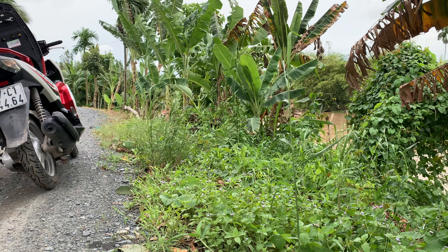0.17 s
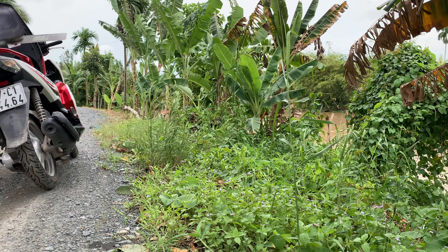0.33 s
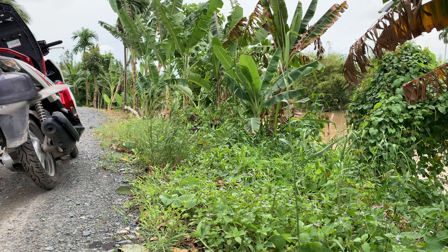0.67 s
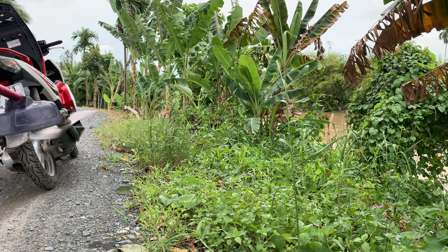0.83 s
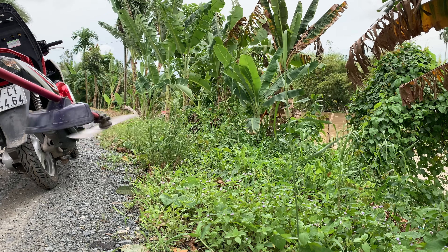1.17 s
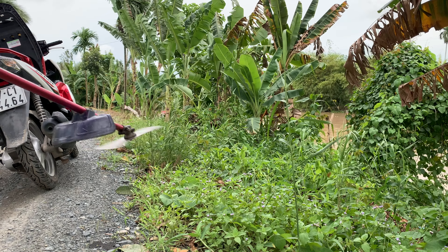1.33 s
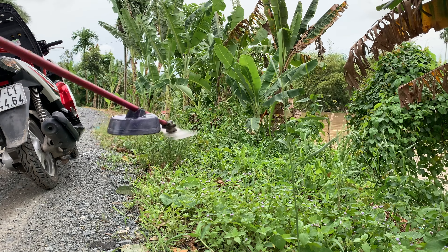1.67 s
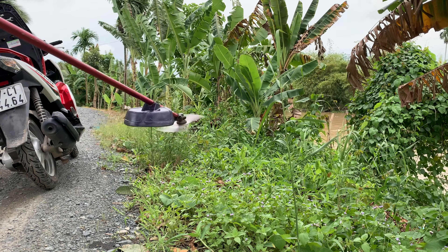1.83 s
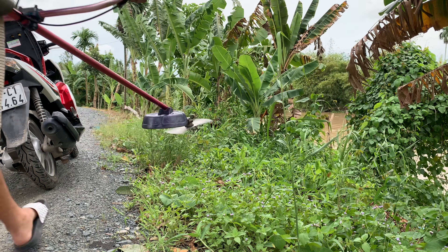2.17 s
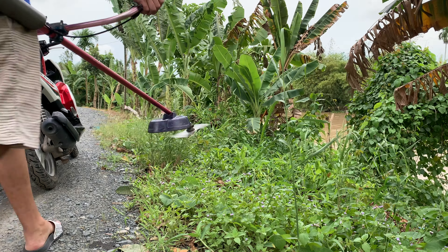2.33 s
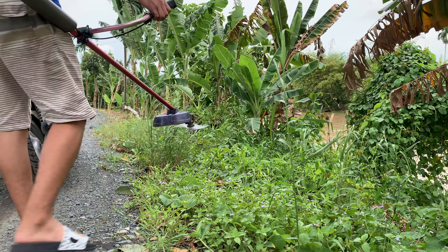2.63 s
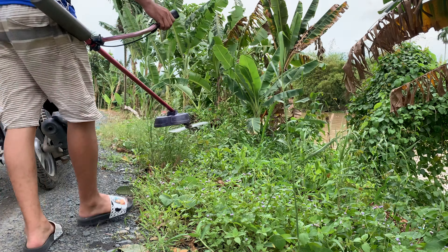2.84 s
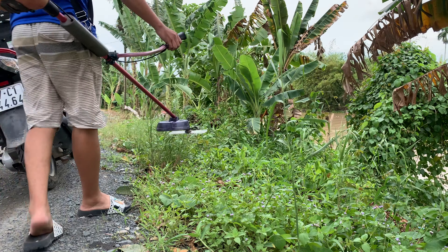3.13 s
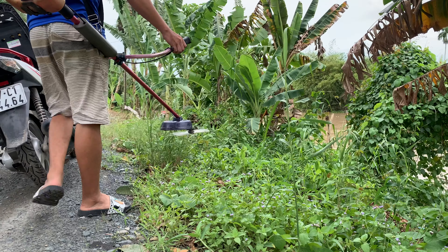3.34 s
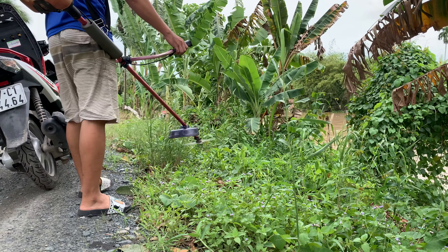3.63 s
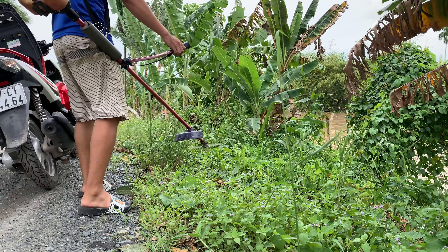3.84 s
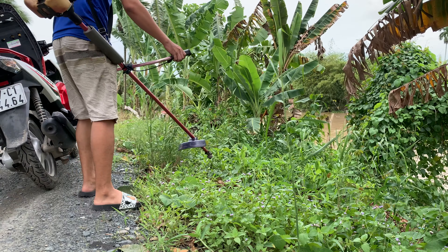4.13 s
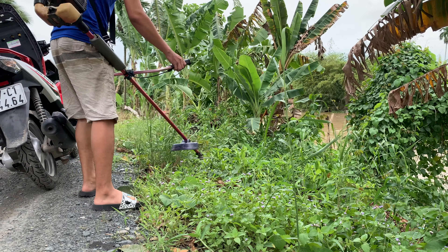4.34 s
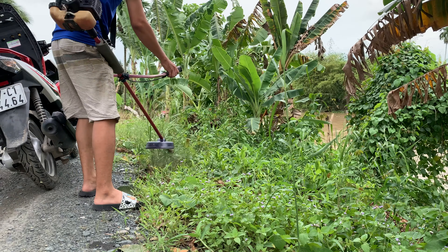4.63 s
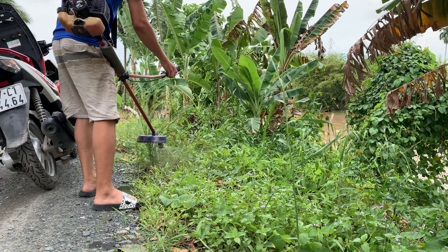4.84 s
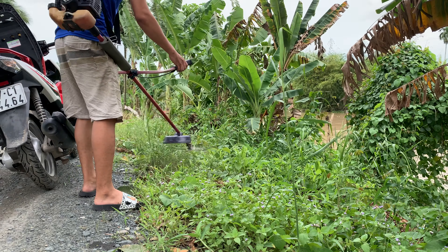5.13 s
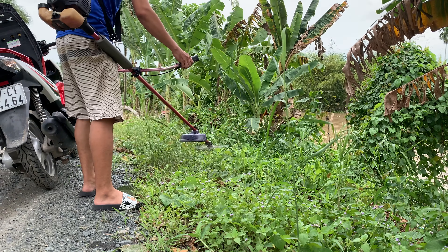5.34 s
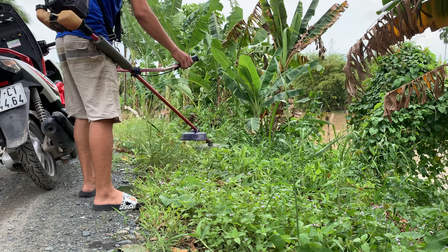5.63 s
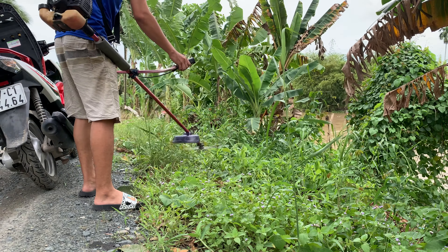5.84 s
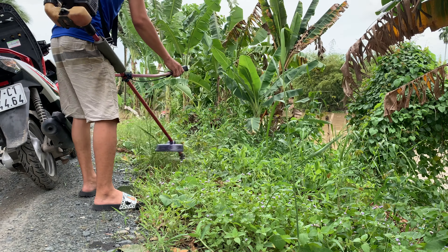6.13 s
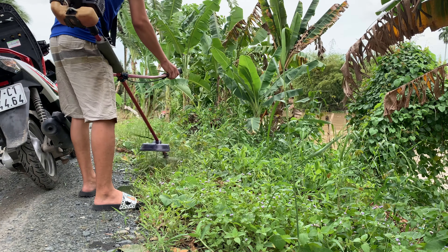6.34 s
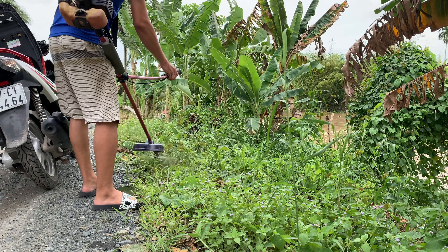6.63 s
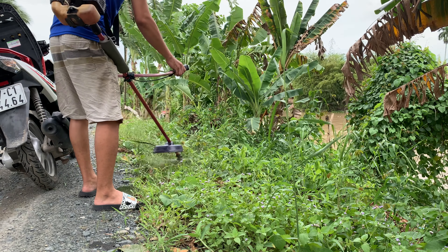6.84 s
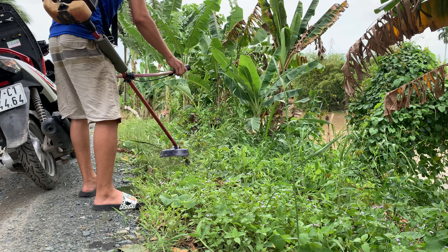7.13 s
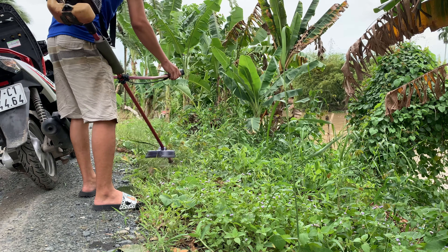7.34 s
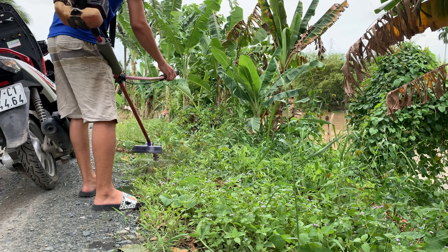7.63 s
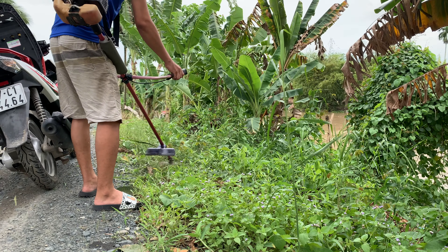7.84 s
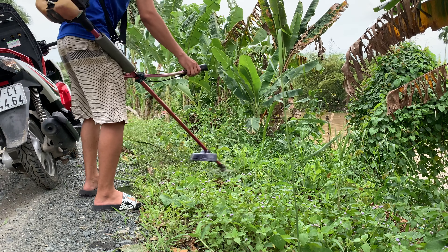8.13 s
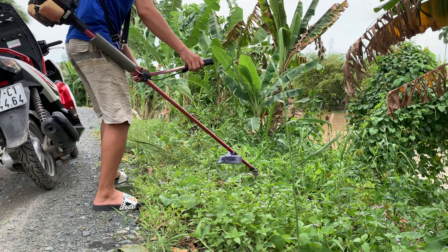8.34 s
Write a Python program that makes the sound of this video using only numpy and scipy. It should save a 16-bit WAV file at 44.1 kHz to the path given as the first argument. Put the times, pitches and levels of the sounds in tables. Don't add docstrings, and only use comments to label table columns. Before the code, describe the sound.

Uneven two-stroke engine rattle passes close by outdoors, turns duller as it moves ahead, its spinning blade swishing and crackling through green weeds.

```python
import sys
import numpy as np
from scipy import signal
from scipy.fft import rfft, irfft, next_fast_len
from scipy.io import wavfile
from scipy.ndimage import uniform_filter1d

SR = 44100
rng = np.random.default_rng(int(sys.argv[2]) if len(sys.argv) > 2 else 0)


def boost(x):
    u = np.asarray(x, float) / 20
    return 10 ** u


def store_wav(level_fs):
    pcm = np.round(np.clip(np.atleast_2d(level_fs), -1, 1) * 32767)
    wavfile.write(sys.argv[1], SR, pcm.T.astype(np.int16))


N = 374409
TIME = np.arange(N) / SR

# time_s, level_db, turned_away_0_to_1 (muffler)
ENGINE = [(0, -13.5, 0.13), (.3, -14.5, 0.2), (.95, -13, 0.17), (1.45, -16.5, 0.19), (2.2, -15, 0.23),
          (2.75, -16.5, 0.42), (3.05, -13, 0.56), (3.5, -15, 0.74), (4, -19.5, 0.76), (4.51, -16.5, 0.9),
          (4.56, -23, 1), (4.72, -25.5, 1), (4.8, -22, 0.82), (6.45, -22.5, 0.66), (6.52, -18.5, 1),
          (6.67, -17.5, 1), (6.72, -22, 0.64), (7.55, -22, 0.97), (8.49, -23, 0.58)]
# time_s, turns_hz
CRANK_SPEED = [(0.0, 69.3), (0.12, 73.6), (1.16, 78.2), (1.32, 78.2), (1.61, 71.9), (2.41, 67.5),
               (2.74, 72.1), (2.91, 78.4), (3.74, 80.0), (4.4, 78.7), (4.77, 80.1), (5.32, 90.8),
               (6.05, 92.2), (6.98, 78.2), (7.27, 77.9), (7.4, 74.9), (8.1, 74.6), (8.49, 77)]
# time_s, timing_scatter_turns, strength_scatter_db
ROUGHNESS = [(0, .004, 2.3), (.2, .003, 2), (.27, .002, .6), (.36, .004, 2.3), (1, .004, 2.3),
             (1.2, .003, 1.7), (1.7, .003, 1.2), (2, .004, 2.3), (2.2, .004, 2.2), (2.28, .002, .8),
             (2.4, .004, 2.2), (3, .002, 1.2), (3.9, .002, 1.7), (4.9, .003, 1.8), (5.9, .006, 2.4),
             (6.4, .005, 2.2), (6.55, .003, 1.1), (6.8, .006, 2.3), (7.05, .003, 1.5), (7.6, .003, 1.4),
             (8, .005, 2.2), (8.49, .005, 2)]
# time_s, over_usual_db, crack_db
BANGS = [(0.039, 3.5, -40), (.137, 3.5, -26), (.338, 6.5, -47), (.378, 6.5, -26), (0.417, 3.5, -40),
         (.486, 5.5, -40), (0.568, 3.5, -38), (.607, 3, -36), (0.671, 4, -41), (0.726, 4.5, -30),
         (.764, 6, -21), (.83, 4.5, -16), (0.868, 6, -41), (0.907, 6.5, -20), (.947, 2, -21),
         (0.986, 5, -30), (1.051, 3, -28), (1.114, 4, -25), (1.267, 5, -27), (1.369, 4, -39),
         (2.137, 5, -26), (2.356, 6.5, -23), (2.473, 5, -16), (2.517, 5.5, -30), (2.704, 6.5, -19),
         (2.842, 4.5, -18), (3.069, 1.5, -18), (3.197, -0.5, -25), (3.273, 2.5, -17), (3.325, 4, -15.5),
         (3.362, 3.5, -14), (3.451, 1, -15.5), (3.615, 1.5, -15.5), (4.001, 1.5, -34), (4.028, 3, -20),
         (4.077, 3.5, -31), (4.203, 2, -32), (4.307, 1, -22), (4.332, 1, -38), (4.357, 2.5, -40),
         (4.458, 2, -31), (4.484, 2, -36), (5.335, 5.5, -54), (5.696, 6.5, -20), (5.902, 5, -31),
         (5.935, 8, -36), (5.966, 8, -18.5), (6.108, 8, -29), (6.242, 5, -19), (6.496, 4, -27),
         (7.128, 2, -53), (7.218, 5.5, -40), (7.894, 3.5, -41), (7.948, 6.5, -20), (7.987, 5.5, -18),
         (8.068, 5.5, -21), (8.108, 5.5, -17), (8.147, 4, -31), (8.214, 2.5, -30), (8.399, 3, -27)]
# time_s, ground_detour_ms, right_port_late_ms
PATH = [
    (0, 1.94, 0.17),
    (.3, 2.46, 0.26),
    (1, 2.51, 0.44),
    (2, 2.38, 0.42),
    (3, 1.91, 0.22),
    (4.6, 1.455, 0.18),
    (5.3, 1.6, 0.18),
    (6, 1.75, 0.17),
    (8.49, 1.52, 0.19),
]

# centre_hz, width_hz, level_db
THUMP_MODES = [(90.7, 90, -11)]
CASE_MODES = [(152.8, 8.4, -4), (254.7, 28, -7)]
BODY_MODES = [(192, 64, 1), (346, 83, 4), (479, 134, 0.5)]
OUTLET_MODES = [(525, 280, 0), (647, 110, 11), (761, 164, 0.5)]
RASP_MODES = [(907, 49, 28), (1153, 140, 19.5), (1277, 105, 30.5), (1700, 11000, 10)]
# order, panel_hz, width_hz, over_outlet_db
PANELS = [(6, 534, 11, -7.5), (9, 620, 70, -8), (7, 585, 17.3, -11.5)]
# freq_hz, density_db
CRACK_COLOUR = [(1500, -30), (2500, -11), (5000, -4.5), (9500, 1.5), (13000, 1.5), (15700, -10)]

# order, level_db
PUMP_ORDERS = [(3.5, -10), (4, -12), (5, -13), (6, 0), (7, -10), (8, -9)]
# time_s, level_db
PUMP_LEVEL = [
    (0, -27.5),
    (1.3, -27.5),
    (2.2, -25),
    (3.2, -31.5),
    (4.3, -33.5),
    (5.7, -30),
    (7, -33.5),
    (8.49, -35.5),
]

# centre_hz, width_hz, level_db
STEEL_MODES = [(2560, 45, -1), (2810, 45, 1), (3400, 45, 1), (3960, 60, -2), (5000, 60, -4), (5660, 80, -4),
               (9100, 250, 2), (11200, 150, 0), (13500, 200, -4)]
# freq_hz, density_db
HISS_COLOUR = [(3500, -30), (5000, -14), (6500, -8), (8000, -2), (9500, 0), (11500, -2), (13000, -4),
               (15700, -10)]
THWACK_COLOUR = [(1100, 1), (1700, -66), (2300, -1.5), (3000, -4.5), (3700, -6.5), (4500, -9.5),
                 (5400, -13), (6200, -12)]
CRACKLE_COLOUR = [(450, -42), (800, -13), (1100, -14), (1600, -14.5), (2500, -19), (3200, -24),
                  (5500, -27.5), (6600, -31)]
# start_s, length_s, shredding_db, thwack_db, crackle_db
CUTS = [(0.114, 0.5, -59, -36.5, -34), (0.766, 0.25, -31.5, -33, -33.5), (1.633, 0.23, -33, -32, -33),
        (1.898, 0.019, -27, -26, -33), (2.596, 0.38, -28.5, -35.5, -34), (3.246, 0.21, -39, -38, -35),
        (4.026, 0.15, -26, -34, -26.5), (4.439, .06, -23.5, -34, -70), (4.49, 0.08, -11, -27, -23),
        (4.59, 0.26, -22.5, -32.5, -48), (4.917, 0.17, -22.5, -39, -37), (6.045, 0.42, -22.5, -52, -44),
        (6.32, 0.069, -14, -33, -40), (6.545, 0.092, -20.5, -54, -58), (6.743, 0.21, -16.5, -28.5, -37),
        (7.17, 0.019, -22, -46, -37), (7.231, 0.065, -14, -23, -29.5), (7.29, 0.14, -13.5, -25.5, -33),
        (7.413, 0.029, -12, -26, -28), (7.97, 0.23, -33, -35, -53), (8.447, .1, -29, -25, -34)]
# time_s, level_db, pitch_hz, width_hz, decay_s
PINGS = [(0.182, -30, 1660, 120, 0.036), (.355, -26, 3150, 500, .008), (0.383, -24, 3100, 500, .008),
         (0.665, -28, 1900, 497, 0.0048), (.749, -23.5, 2460, 900, 0.0041), (0.893, -28, 2500, 800, 0.0061),
         (0.934, -27, 2500, 900, 0.0062), (1.682, -34, 4900, 900, 0.0063), (1.746, -31, 4870, 900, 0.0065),
         (1.798, -21, 4960, 900, .006), (4.555, -22, 3020, 3000, 0.0054), (6.98, -44, 3240, 70, 0.14),
         (7.251, -41, 3230, 297, 0.064), (7.32, -27.5, 2700, 350, 0.05), (7.33, -29, 1500, 120, 0.039),
         (7.452, -22, 2760, 2500, 0.0043), (7.461, -37, 2780, 163, 0.11), (7.46, -44, 2580, 120, 0.11),
         (7.459, -41, 3360, 80, 0.03)]
# peak_s, swell_s, pitch_hz, width_hz, level_db
WHISTLES = [
    (1.83, 0.3, 4970, 220, -35.5),
    (2.75, 0.99, 7930, 746, -37.5),
]
# freq_hz, gain_db
SHADE = [(500, 0), (800, -2), (1250, -10), (1800, -3), (3000, -2), (5000, 0)]

# facing_db, turned_away_db
THUMP_DB, BODY_DB, OUTLET_DB, RASP_DB = (-4, -2), (0, -8.5), (-5.5, 2), (-21.5, -15)
# facing_db, turned_away_db
FOURTH_DB, EIGHTH_DB = (0, -6), (11, -6.5)
OUTLET_SHOWS = 0.61
# facing_db, turned_away_db
IDLE_HISS_DB, IDLE_THWACK_DB, IDLE_CRACKLE_DB = (-39, -28.5), (-32, -31), (-27, -41)
SHARED, APART = (.64, .85, .64, .64), (.7, .48, .7, .8)

RICH_EVERY_TURNS = (2, 2, 3, 3, 3)
RICH, LOOSE = 2.1, .45
EARLY_PER_DB = .5
CRACKS_OVER_DB, CRACK_DB, CRACK_SPREAD_DB = 4.5, -30, 2
CRACK_LATE_S, CRACK_RISE_S, CRACK_FALL_S = .001, .0006, .0025
THUMP_LATE_S, CASE_LATE_S = .005, .0033
BODY_EARLY_S_PER_DB, OUTLET_EARLY_S_PER_DB = .00011, .00005
BODY_SWING, OUTLET_SWING, CASE_SWING = .9, 1.05, 1.4
COWL_HZ, COWL_WIDTH_HZ, BLUR_DB = 673, 39.7, 4
THUMP_WANDER_DB, FAN_WANDER_DB = 1.2, 1.5
PUMP_HZ = 14.63
CUT_ATTACK_S, CUT_RELEASE_S, CUT_PATCHY_DB = .025, .045, 1.5
LOOSE_HISS_DB = -18
BOUNCE_SHARE = 0.52
SPLIT_HZ, TREBLE_LEAD_S = 4700, 1 / 4610
TOP_HZ = 15500


def columns(table):
    s, *rest = np.transpose(table)
    return [np.interp(TIME, s, c) for c in rest]


def unit(x):
    return x / np.sqrt(np.mean(x ** 2))


def noise():
    return rng.standard_normal(N)


def ring(x, modes):
    out = 0
    for k, (hz, width_hz, db) in enumerate(modes):
        out = out + (-1) ** k * boost(db) * signal.lfilter(*signal.iirpeak(hz, hz / width_hz, SR), x)
    return out


def ring_within(x, modes, hz, width_hz):
    return ring(ring(x, modes), [(hz, width_hz, 0)])


def colour(x, points, lead_s=0):
    size = next_fast_len(N + 64)
    hz = np.arange(size // 2 + 1) * SR / size
    point_hz, point_db = np.array(points).T
    response = boost(np.interp(np.log(hz + 1), np.log(point_hz), point_db))
    if lead_s:
        turn = 2 * np.pi * hz * lead_s
        response = response * np.exp(1j * (turn - np.sin(2 * turn) / 2))
    return irfft(rfft(x, size) * response, size)[:N]


def fade(x, seconds):
    return signal.lfilter([1], [1, -np.exp(-1 / (seconds * SR))], x)


def later(x, ms):
    return np.interp(TIME - ms / 1000, TIME, x)


def pulses(s, size):
    at = np.clip(s * SR, 0, N - 2)
    i = at.astype(int)
    return np.bincount(i, size * (1 - at + i), N) + np.bincount(i + 1, size * (at - i), N)


def walk(rate_hz):
    k = int(SR / rate_hz)
    return 1.66 * uniform_filter1d(np.repeat(rng.standard_normal(N // k + 1), k), k)[:N]


def turning(pair_db, away):
    return pair_db[0] + (pair_db[1] - pair_db[0]) * away


def engine_levels():
    level_db, away = columns(ENGINE)
    shown = (away / OUTLET_SHOWS).clip(0, 1)
    thump_db = uniform_filter1d(level_db + turning(THUMP_DB, away), SR // 2)
    body_db = level_db + turning(BODY_DB, away)
    outlet_db = level_db + turning(OUTLET_DB, shown)
    rasp_db = level_db + turning(RASP_DB, shown)
    blur_db = BLUR_DB * (columns(ROUGHNESS)[1] - 1)
    off_cowl_db = ((8 * columns(CRANK_SPEED)[0] - COWL_HZ) / COWL_WIDTH_HZ) ** 2
    eighth_db = turning(EIGHTH_DB, away) - blur_db - off_cowl_db
    return thump_db, body_db, outlet_db, rasp_db, turning(FOURTH_DB, away), eighth_db


def firings(crank_hz):
    s, over_db, crack_db = np.transpose(BANGS)
    turns = np.cumsum(crank_hz) / SR
    slip = np.unwrap(np.interp(s, TIME, turns) % 1, period=1)
    slow_slip = uniform_filter1d(np.interp(TIME, s, slip), SR // 6)
    turns = turns - uniform_filter1d(slow_slip, SR // 6)
    count = np.arange(int(turns[0]) + 1, int(turns[-1]))
    chance = rng.standard_normal((N // 200, 3))[:len(count)].T
    jitter, scatter_db = (np.interp(count, turns, c) for c in columns(ROUGHNESS))

    hard = (np.round(np.interp(s, TIME, turns)) - count[0]).astype(int).clip(1, len(count) - 2)
    index = np.arange(len(count))
    since_hard = index - np.maximum.accumulate(index * np.isin(index, hard))
    rich_turns = np.cumsum((3, *rng.choice(RICH_EVERY_TURNS, N // 200)))
    rich = np.isin(since_hard, rich_turns)
    db = scatter_db * (RICH * (rich - rich.mean()) + LOOSE * chance[1].clip(-2, 2))
    crack = (db > CRACKS_OVER_DB) * boost(CRACK_DB + CRACK_SPREAD_DB * chance[2])
    db[hard - 1] = -2
    db[hard + 1] = -1.5
    db[hard], crack[hard] = over_db, boost(crack_db)
    when = np.interp(count + jitter * (chance[0] - EARLY_PER_DB * db), turns, TIME)
    return turns, when, db, crack


def port_push(when, db, swing, early_s_per_db):
    lowpass = signal.butter(3, 950, fs=SR, output="sos")
    return signal.sosfilt(lowpass, pulses(when - early_s_per_db * db, boost(swing * db)))


def cooling_fan(turns, body_db, outlet_db, fourth_db, eighth_db):
    fourth = boost(body_db + fourth_db + FAN_WANDER_DB * walk(4.06)) * np.sin(8 * np.pi * turns)
    eighth = boost(outlet_db + eighth_db + 2.3 * walk(16)) * np.sin(16 * np.pi * turns)
    fan = fourth + eighth
    crank_hz = columns(CRANK_SPEED)[0]
    for order, hz, width_hz, over_db in PANELS:
        off_panel_db = ((order * crank_hz - hz) / width_hz) ** 2
        level_db = outlet_db + over_db + FAN_WANDER_DB * walk(9.1) - off_panel_db
        fan = fan + boost(level_db) * np.sin(2 * np.pi * order * turns)
    return fan


def engine(thump_db, body_db, outlet_db, rasp_db, fourth_db, eighth_db):
    turns, when, db, crack_gain = firings(columns(CRANK_SPEED)[0])
    puff = fade(fade(pulses(when, boost(db)), .0006), .004)
    puff = unit(puff + 23.0 * np.mean(puff))

    swing = pulses(when + THUMP_LATE_S, boost(.6 * db) - .3)
    thump = boost(THUMP_WANDER_DB * walk(20)) * unit(ring(swing, THUMP_MODES))
    thump = thump + .45 * unit(ring(noise(), THUMP_MODES))
    knock = pulses(when + CASE_LATE_S, boost(CASE_SWING * db))
    case = unit(ring_within(knock, CASE_MODES, 210, 130))

    body = unit(ring(port_push(when, db, BODY_SWING, BODY_EARLY_S_PER_DB), BODY_MODES))
    body = body + .25 * unit(ring_within(puff * noise(), BODY_MODES, 330, 500))
    outlet_push = port_push(when, db, OUTLET_SWING, OUTLET_EARLY_S_PER_DB)
    outlet = unit(ring_within(outlet_push, OUTLET_MODES, 630, 600))
    outlet = outlet + .17 * unit(ring_within(puff * noise(), OUTLET_MODES, 630, 600))
    rasp = unit(ring_within(pulses(when, boost(.9 * db)), RASP_MODES, 1250, 1200))

    fan = cooling_fan(turns, body_db, outlet_db, fourth_db, eighth_db)
    burst = fade(fade(pulses(when + CRACK_LATE_S, crack_gain), CRACK_FALL_S), CRACK_RISE_S)
    crack = burst / (CRACK_RISE_S * SR) * unit(colour(noise(), CRACK_COLOUR))
    low = boost(thump_db - 6.0) * thump + boost(thump_db - 18.0) * case
    low = low + boost(body_db - 3.0) * body + boost(outlet_db - 8.0) * outlet
    return low + boost(rasp_db) * rasp + boost(-4.5) * fan, crack, puff


def pump():
    cycle = 2 * np.pi * np.cumsum(PUMP_HZ * (1 + .002 * walk(3))) / SR
    drone = 0
    for order, db in PUMP_ORDERS:
        drone = drone + boost(db + 1.5 * walk(5)) * np.sin(order * cycle + order ** 2)
    return boost(columns(PUMP_LEVEL)[0] + 3) * drone


def snaps():
    hits = (rng.random(N) < 2500 / SR) * boost(3.5 * rng.exponential(size=N).clip(0, 3.5))
    return unit(fade(fade(hits, 0.0005), 0.0032) * boost(0.82 * walk(70)))


def cutting(idle_db, column):
    t = TIME[::64, None]
    start_s, length_s, db = np.array(CUTS)[:, [0, 1, column]].T
    rise = ((t - start_s) / CUT_ATTACK_S).clip(0, 1)
    fall = np.exp(-(t - start_s - length_s).clip(0) / CUT_RELEASE_S)
    total = np.sqrt(np.sum((boost(db) * rise * fall) ** 2, axis=1))
    swept = np.interp(TIME, t[:, 0], total) * boost(CUT_PATCHY_DB * walk(25))
    return np.hypot(boost(turning(idle_db, columns(ENGINE)[1])), swept)


def blade(puff, snap):
    drive = (2.3 * snap + 0.3 * puff + .3 * boost(1.9 * walk(36))) * noise()
    steel = unit(ring(drive * boost(2.5 * walk(12)), STEEL_MODES))
    whistle = 0
    for peak_s, swell_s, hz, width_hz, db in WHISTLES:
        tone = unit(ring_within(drive, [(hz, width_hz, 0)], hz, 1.7 * width_hz))
        whistle = whistle + boost(db) * np.exp(-((TIME - peak_s) / swell_s) ** 2) * tone
    hiss = unit(colour(drive, HISS_COLOUR)) + .42 * steel
    return boost(-8.0) * cutting(IDLE_HISS_DB, column=2) * hiss + whistle


def plant_gains(rasp_db):
    thwack = cutting(IDLE_THWACK_DB, column=3)
    crackle = cutting(IDLE_CRACKLE_DB, column=4)
    return boost(rasp_db - 17), thwack, crackle, cutting(IDLE_HISS_DB, column=2)


def scatter(puff, snap, gains, shares):
    lowpass = signal.butter(6, 3200, fs=SR, output="sos")
    gas = unit(signal.sosfilt(lowpass, ring(puff * noise(), RASP_MODES)))
    thwack_drive = 0.66 * snap + 0.2 * puff + .5 * boost(3.5 * walk(30))
    thwack = unit(colour(thwack_drive * noise(), THWACK_COLOUR))
    crackle = unit(colour(snap * noise(), CRACKLE_COLOUR))
    loose = boost(LOOSE_HISS_DB) * unit(colour((snap + .5) * noise(), HISS_COLOUR))
    layers = (gas, thwack, crackle, loose)
    return sum(share * gain * layer for share, gain, layer in zip(shares, gains, layers))


def pings():
    out = np.zeros(N)
    for s, db, hz, width_hz, decay_s in PINGS:
        start = int(s * SR)
        t = np.arange(min(int(7 * decay_s * SR), N - start)) / SR
        tone = unit(ring_within(rng.standard_normal(SR), [(hz, width_hz, 0)], hz, 2 * width_hz))
        out[start:][:len(t)] += boost(db) * np.exp(-t / decay_s) * tone[-len(t):]
    return out


def scene():
    bounce_ms, port_ms = columns(PATH)
    levels = engine_levels()
    low, crack, puff = engine(*levels)
    gains = plant_gains(levels[3])
    snap = snaps()
    sound = low + BOUNCE_SHARE * later(low, bounce_ms) + crack
    sound = sound + blade(puff, snap) + scatter(puff, snap, gains, SHARED)
    under = colour(sound, [(SPLIT_HZ - 300, 0), (SPLIT_HZ + 300, -40)])
    over = sound - under
    left = sound + scatter(puff, snap, gains, APART)
    right = colour(later(under, port_ms) + scatter(puff, snap, gains, APART), SHADE)
    right = right + colour(over, [(100, 0), (200, 0)], TREBLE_LEAD_S)
    return np.array([left, right]) + pings() + pump() * boost([[0.3], [-0.3]])


def low_pass(x):
    return signal.sosfilt(signal.butter(12, 16490, fs=SR, output="sos"), x)


def record(dry):
    cut = signal.sosfilt(signal.butter(5, 47, "high", fs=SR, output="sos"), dry)
    cut = signal.sosfilt(signal.ellip(10, .2, 60, TOP_HZ, fs=SR, output="sos"), cut)
    soft = np.tanh(.7 * cut) / .7
    return low_pass(soft)


dry = scene()
out = record(dry)
store_wav(out)
```